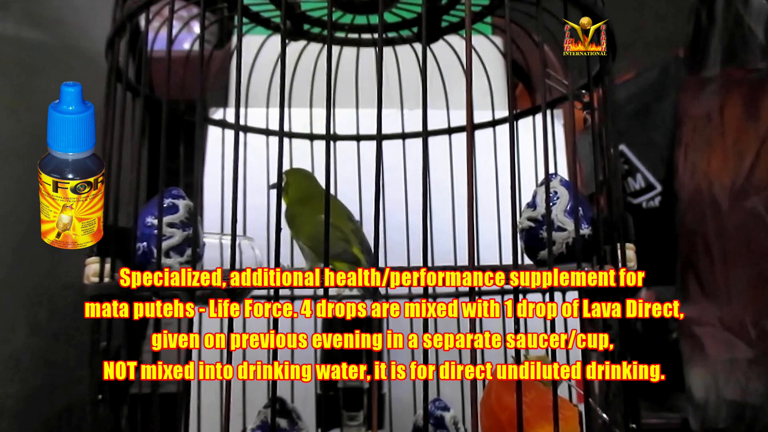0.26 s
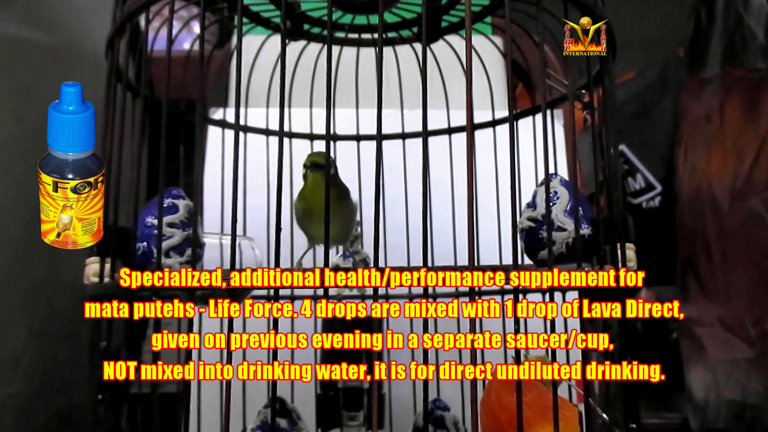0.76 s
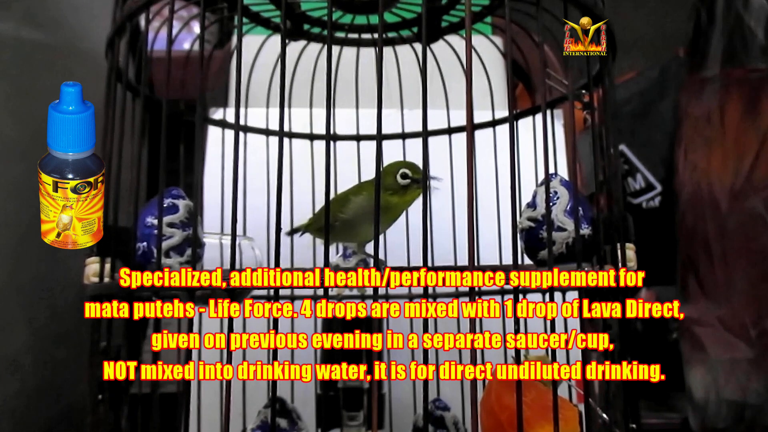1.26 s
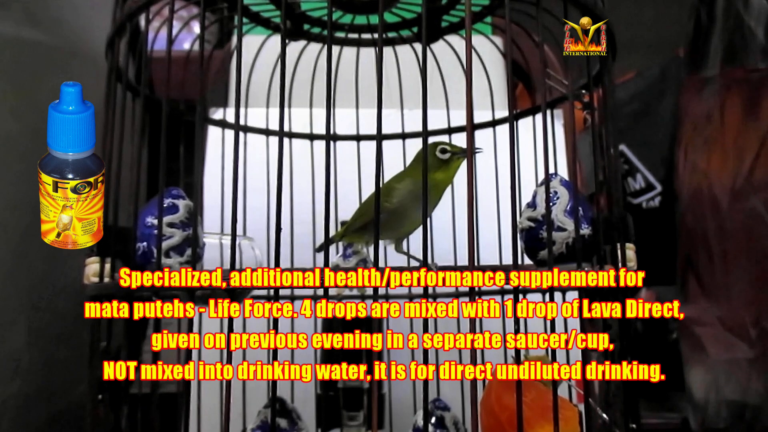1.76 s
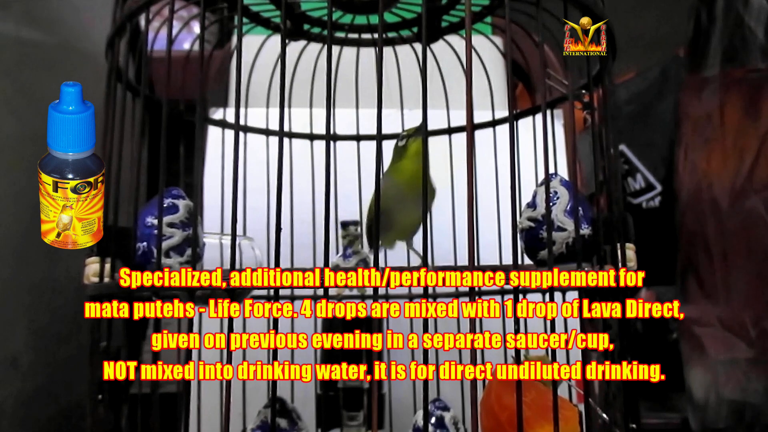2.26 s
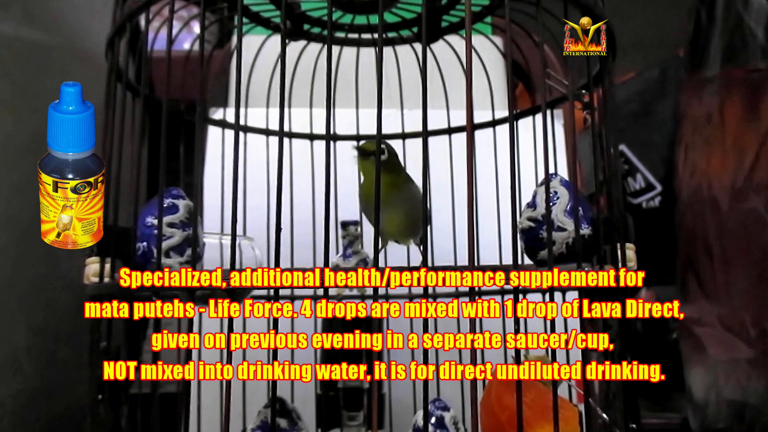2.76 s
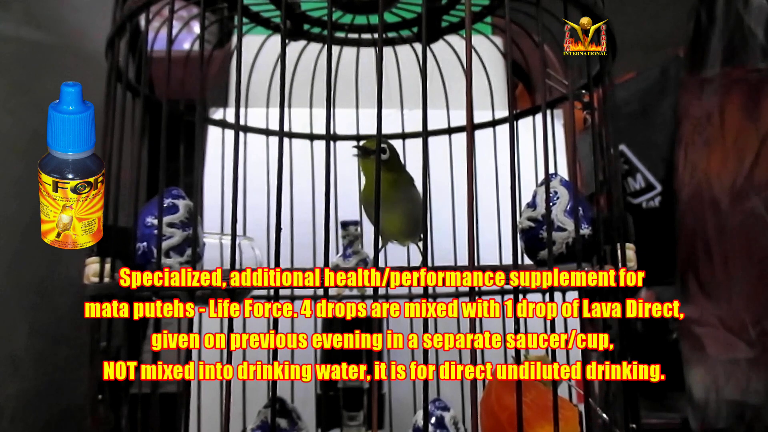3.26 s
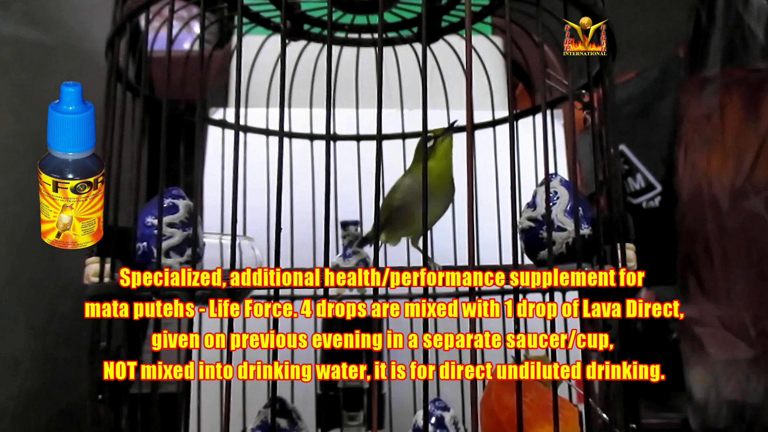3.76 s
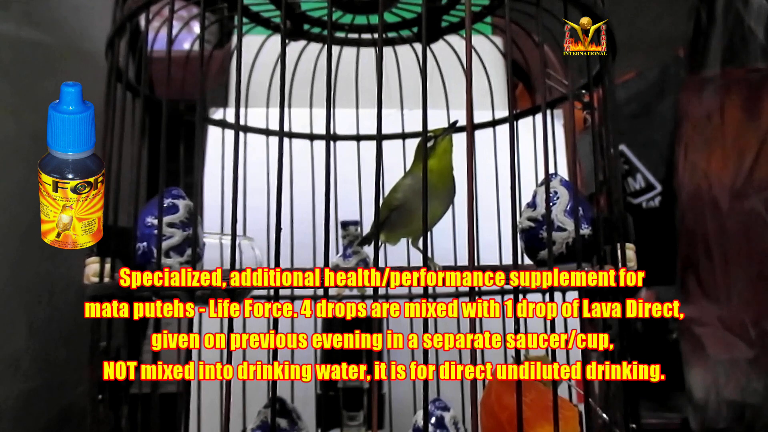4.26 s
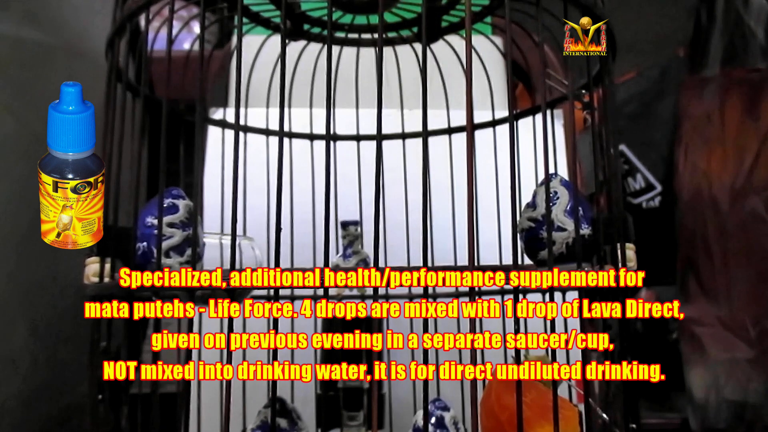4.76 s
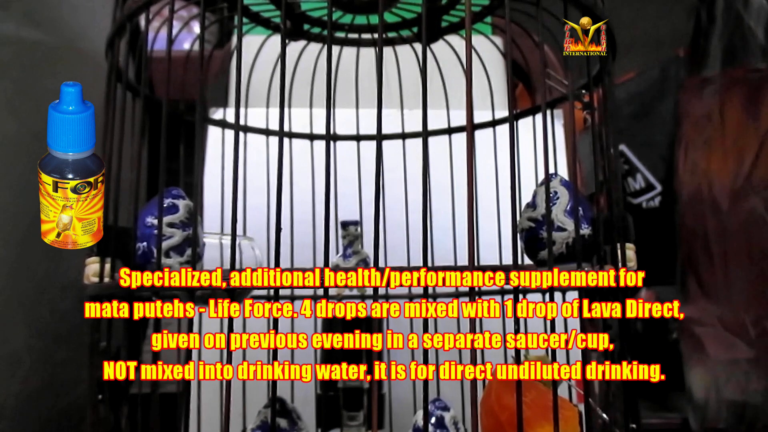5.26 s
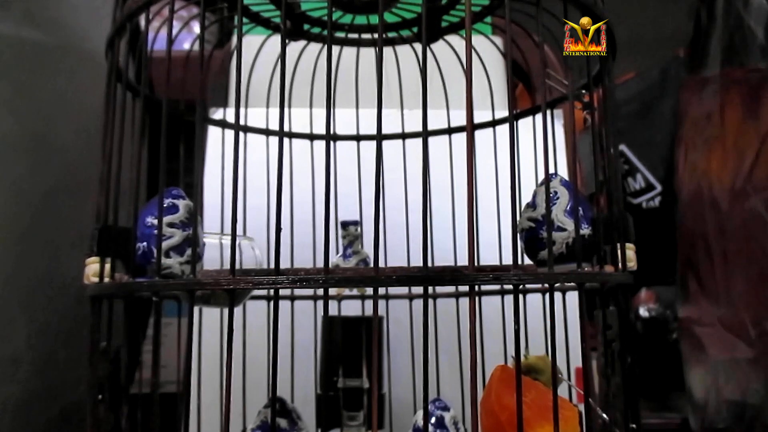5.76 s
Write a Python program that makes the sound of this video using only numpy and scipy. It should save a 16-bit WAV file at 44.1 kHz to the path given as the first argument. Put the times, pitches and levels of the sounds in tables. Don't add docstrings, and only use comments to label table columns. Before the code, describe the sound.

A small caged bird sings quick, high, falling warbled chirps in a hard room while distant birds answer over a faint fan hum and street rumble.

```python
import sys
import numpy as np
from scipy import signal
from scipy.fft import rfft, irfft, next_fast_len
from scipy.io import wavfile
from scipy.ndimage import uniform_filter1d

SR = 44100
rng = np.random.default_rng(int(sys.argv[2]) if len(sys.argv) > 2 else 0)


def to_wav(sig):
    pcm = np.clip(np.atleast_2d(sig), -1, 1) * 32767
    pcm = np.round(pcm).astype(np.int16)
    wavfile.write(sys.argv[1], SR, pcm.T)


def ratio_of_db(decibels):
    return 10 ** (np.asarray(decibels, float) / 20)


N = 265041
TIME = np.arange(N) / SR
PADDED = next_fast_len(N + SR // 10)


def singer():
    # (time [s], length [s], crest pitch [Hz], last pitch [Hz], level [dB])
    syllables = dict( slide=[(0.613, 0.12, 5354, 3463, -18), (1.791, 0.13, 5180, 3100, -18),
                 (3.135, 0.128, 5313, 3173, -18)], swoop=[(1.395, 0.132, 5337, 3096, -18.5),
                 (4.908, 0.13, 5274, 3558, -20)], arch=[(0.317, 0.15, 5050, 3723, -18),
                 (4.608, 0.13, 4647, 3274, -19)], hook=[(2.505, 0.129, 5020, 3330, -20.5),
                 (5.688, 0.125, 5050, 3260, -20.5)], held=[(2.752, 0.133, 4622, 3216, -19.5),
                 (5.957, 0.12, 4680, 3140, -22)], droop=[(-0.03, 0.146, 4790, 3488, -23.5),
                 (0.882, 0.14, 4491, 3150, -23.5), (3.562, 0.128, 4412, 3140, -18.5)],
                 short=[(1.231, 0.0945, 4260, 3177, -33), (4.442, 0.091, 4623, 3760, -22)],
                 shelf=[(3.41, 0.08, 4660, 3545, -25.5)], high_step=[(2.29, 0.1, 5693, 4858, -18.5),
                 (3.777, 0.092, 5707, 4784, -18.5), (5.457, 0.096, 5730, 4865, -18.5)],
                 low_step=[(2.09, 0.12, 4617, 4100, -22.5)], murmur=[(5.256, 0.129, 4650, 4100, -16.5)])
    contours = dict( slide=dict(open_s=0.006, opening=0.87, crest_s=0.012, shoulder_at=0.25, shoulder=0.8, knee_at=0.6, knee=0.33),
                swoop=dict(open_s=0.0064, opening=0.8, crest_s=0.013, shoulder_at=0.34, shoulder=0.8, knee_at=0.52, knee=0.3),
                arch=dict(open_s=0.014, opening=0.91, crest_s=0.037, shoulder_at=0.4, shoulder=0.85, knee_at=0.6, knee=0.48),
                hook=dict(open_s=0.0061, opening=0.94, crest_s=0.024, shoulder_at=0.25, shoulder=0.93, knee_at=0.58, knee=0.2),
                held=dict(open_s=0.0054, opening=0.98, crest_s=0.045, shoulder_at=0.45, shoulder=0.87, knee_at=0.7, knee=0.44),
                droop=dict(open_s=0.0073, opening=1, crest_s=0.018, shoulder_at=0.4, shoulder=0.82, knee_at=0.7, knee=0.32),
                short=dict(open_s=0.013, opening=0.9, crest_s=0.017, shoulder_at=0.25, shoulder=1, knee_at=0.65, knee=0.3),
                shelf=dict(open_s=0.0087, opening=0.85, crest_s=0.013, shoulder_at=0.13, shoulder=0.99, knee_at=0.4, knee=0.24),
                high_step=dict(open_s=0.007, opening=0.92, crest_s=0.014, shoulder_at=0.4, shoulder=0.9, knee_at=0.63, knee=0.07),
                low_step=dict(open_s=0.0094, opening=0.97, crest_s=0.016, shoulder_at=0.55, shoulder=0.4, knee_at=0.65, knee=0.02),
                murmur=dict(open_s=0.007, opening=0.94, crest_s=0.017, shoulder_at=0.37, shoulder=0.55, knee_at=0.63, knee=0.03))
    voices = dict( slide=dict(depth_hz=115, warble_hz=124.2, peak_s=0.011, swell_db=12.5, fade_db=13, flick_hz=450, snap_db=-74.5),
              swoop=dict(depth_hz=137, warble_hz=110.2, peak_s=0.03, swell_db=5, fade_db=11.5, flick_hz=350, snap_db=-66),
              arch=dict(depth_hz=135, warble_hz=118.2, peak_s=0.036, swell_db=6.5, fade_db=15.5, flick_hz=349, snap_db=-46),
              hook=dict(depth_hz=156, warble_hz=115.6, peak_s=0.023, swell_db=11.5, fade_db=10.5, flick_hz=250, snap_db=-53.5),
              held=dict(depth_hz=125, warble_hz=110.5, peak_s=0.058, swell_db=4.5, fade_db=14, flick_hz=300, snap_db=-66),
              droop=dict(depth_hz=114, warble_hz=111.64, peak_s=0.036, swell_db=6, fade_db=7, flick_hz=400, snap_db=-53.5),
              short=dict(depth_hz=65, warble_hz=112.1, peak_s=0.027, swell_db=3, fade_db=-3.5, flick_hz=500, snap_db=-47),
              shelf=dict(depth_hz=45, warble_hz=135, peak_s=0.0067, swell_db=7, fade_db=4, flick_hz=500, snap_db=-47.5),
              high_step=dict(depth_hz=90, warble_hz=128.83, peak_s=0.011, swell_db=6, fade_db=1.5, flick_hz=150, snap_db=-76),
              low_step=dict(depth_hz=140, warble_hz=112, peak_s=0.022, swell_db=9, fade_db=-7, flick_hz=150, snap_db=-69),
              murmur=dict(depth_hz=124, warble_hz=119, peak_s=0.05, swell_db=11, fade_db=19, flick_hz=60, snap_db=-58))
    # (time [s], level of the top multiples [dB])
    beak_turns = [(0.35, 7.5), (0.62, -6.5), (1.25, -7), (1.4, 0), (1.85, -8.5), (2.1, 4), (2.3, 6),
                  (2.8, -11), (3.15, -3), (3.42, 0.5), (3.57, 2.5), (3.78, -6.5), (4.45, 15.5),
                  (4.61, 13.5), (4.92, -9.5), (5.46, -2.5), (5.7, -13)]
    # (time [s], length [s], centre [Hz], width [Hz], level [dB])
    rustles = [
        (0.65, 0.087, 18000, 4000, -76.5),
        (2.88, 0.04, 12000, 7000, -79),
        (4.875, 0.05, 5940, 2160, -62),
        (2.1, 0.0087, 7000, 2500, -76.5),
    ]
    out = np.zeros(N)
    for name, rows in syllables.items():
        for s, *note in rows:
            facing_db = np.interp(s, *np.transpose(beak_turns))
            add(out, s, chirp(*note, facing_db, **contours[name], **voices[name]))
    for s, length, hz, width_hz, db in rustles:
        size = int(length * SR)
        envelope = ratio_of_db(db + 5 * walk(300, size=size)) * np.hanning(size)
        add(out, s, envelope * noise_band(hz, width_hz, size=size))
    return out


def chirp(length, crest_hz, last_hz, level_db, facing_db, warble_hz, snap_db, **shape):
    # (level [dB], share of the facing followed)
    overtones = [(-61, 0.2), (-57.5, 0.29), (-63, 0.67), (-66, 0.96)]
    # (multiple of the syrinx rate, level against their group [dB])
    upper_partials = [(5, -13), (6, -1.5), (7, -5.5), (8, -8)]
    swing, throb = 1.9, 0.38
    stumble_hz = 25
    bead_db, patchy_db = 1.2, 5.5
    age = np.arange(0, length, 1 / SR)
    size = len(age)
    curves = melody(age, crest_hz, last_hz, level_db, **shape)
    hz, db, depth_hz = (uniform_filter1d(curve, size=36) for curve in curves)
    first_db, third_db, fourth_db, upper_db = (base_db + share * facing_db for base_db, share in overtones)

    warble = np.sin(2 * np.pi * warble_hz * age + 0.4 * walk(40, size=size))
    warble = warble * ratio_of_db(1.8 * walk(70, size=size))
    stumble = stumble_hz * depth_hz / 100 * walk(45, size=size)
    syrinx_hz = (hz + swing * depth_hz * warble + stumble) / 2
    phase = 2 * np.pi * np.cumsum(syrinx_hz) / SR
    whistle_level = ratio_of_db(db + bead_db * walk(110, size=size)) * (1 + throb * depth_hz / 100 * warble)
    out = whistle_level * np.sin(2 * phase)

    snap = ratio_of_db(snap_db) * np.exp(-((age - 0.006) / 0.0042) ** 2)
    flash = np.sin(3 * phase) + np.sin(4 * phase) + 0.1 * np.sin(5 * phase)
    out += snap * (flash + 1.2 * noise_band(4600, 2900, size=size))

    beak_db = upper_db - 14 * np.clip(1 - age / (0.63 * age[-1]), 0, 1)
    effort = ratio_of_db(0.05 * (db + 12))
    partials = [(1, first_db), (3, third_db), (4, fourth_db)]
    partials += [(k, beak_db + offset_db) for k, offset_db in upper_partials]
    for k, partial_db in partials:
        patchy = ratio_of_db(partial_db + patchy_db * min(k / 4, 1) * walk(34, size=size))
        patchy = patchy * np.clip((15400 - k * syrinx_hz) / 500, 0, 1)
        out += effort * patchy * np.sin(k * phase)
    out += effort * ratio_of_db(beak_db - 14) * noise_band(12000, 7000, size=size)
    edge_fade = np.clip(np.minimum(age, age[-1] - age) / 0.002, 0, 1)
    return np.sqrt(2) * out * edge_fade


def melody(age, crest_hz, last_hz, level_db, open_s, opening, crest_s, shoulder_at, shoulder,
           knee_at, knee, depth_hz, peak_s, swell_db, fade_db, flick_hz):
    closed_hz, open_db, ease_s = 2732, 24.5, 0.0038
    close_s, close_db = 0.007, 10.5
    throat_hz, throat_db_per_khz = 4100, 8.5
    calm, calm_curve = 0.88, 2.4
    length = age[-1]
    opened = np.clip(age / open_s, 0, 1)
    climbed = np.clip(age / crest_s, 0, 1)
    shut = np.clip(1 - (length - age) / close_s, 0, 1)
    bends_s = np.sort([crest_s, shoulder_at * length, knee_at * length, length - close_s])
    height = np.interp(age, bends_s, [1, shoulder, knee, 0])
    height = uniform_filter1d(height, int(ease_s * SR) + 1, mode="nearest")

    hz = last_hz + (crest_hz - last_hz) * height
    hz = hz - crest_hz * (1 - opening) * (1 - climbed) - flick_hz * shut

    db = level_db - swell_db * np.clip(1 - age / peak_s, 0, 1)
    db = db - fade_db * np.clip((age - peak_s) / (length - peak_s), 0, 1)
    db = db - throat_db_per_khz * np.clip(throat_hz - hz, 0, None) / 1000
    db = db - open_db * (1 - opened) - close_db * shut

    depth = depth_hz * np.clip((age - open_s) / max(peak_s - open_s, 0.002), 0, 1)
    depth = depth * (1 - calm * np.clip(1 - height, 0, 1) ** calm_curve) * (1 - shut)
    return closed_hz + (hz - closed_hz) * np.sin(np.pi / 2 * opened), db, depth


def other_birds():
    # (time [s], length [s], first pitch [Hz], last pitch [Hz], level [dB])
    answers = [(0.115, 0.03, 4400, 3270, -36), (0.261, 0.0388, 5568, 4210, -40.5),
               (1.674, 0.067, 5370, 3440, -44), (1.923, 0.055, 4805, 4730, -42),
               (2.026, 0.071, 4205, 3370, -45), (2.203, 0.067, 3740, 2820, -52.5),
               (3.01, 0.114, 4520, 3450, -48), (3.268, 0.12, 4420, 3560, -44),
               (3.496, 0.078, 4780, 4620, -36), (3.765, 0.099, 4320, 3400, -45.5),
               (3.91, 0.12, 4460, 3184, -47), (4.093, 0.186, 5050, 3344, -44.5),
               (4.193, 0.11, 4780, 4136, -40), (4.299, 0.0504, 4304, 3380, -45),
               (4.405, 0.039, 5446, 5100, -41.5), (4.653, 0.047, 5870, 5700, -64.5)]
    out = np.zeros(N)
    for s, length, first_hz, last_hz, db in answers:
        part = np.arange(0, 1, 1 / (length * SR))
        hz = last_hz + (first_hz - last_hz) * (1 - part) ** 0.99
        hz = hz + 170 * np.sin(2 * np.pi * 115 * part * length)
        phase = np.pi * np.cumsum(hz) / SR
        tone = np.sin(2 * phase) + ratio_of_db(-38.5) * np.sin(3 * phase)
        envelope = np.clip(np.minimum(part / 0.033, (1 - part) / 0.14), 0, 1)
        add(out, s, np.sqrt(2) * ratio_of_db(db) * envelope * tone)
    return out


def engine():
    # (time [s], firing rate [Hz], nearness [dB])
    revs = [
        (0, 53.96, -8.5),
        (2.1, 57.17, -1.5),
        (3.051, 60.14, 2.5),
        (3.6, 67.55, -2),
        (4.801, 76.27, -1),
        (5.6, 81.06, 0),
        (6.01, 83.3, -4),
    ]
    # (centre [Hz], width [Hz], level [dB])
    booms = [(71, 13, -59.5), (141.6, 22, -54), (234.3, 20, -56)]
    s, firing_hz, near_db = np.transpose(revs)
    hz = np.interp(TIME, s, firing_hz) * (1 + 0.0066 * walk(3.8))
    phase = 2 * np.pi * np.cumsum(hz) / SR
    out = np.zeros(N)
    for k in range(1, 5):
        boom = sum(ratio_of_db(db) / (1 + ((k * hz - centre) / width_hz * 2) ** 2) for centre, width_hz, db in booms)
        waver = ratio_of_db(np.interp(TIME, s, near_db) + 3.5 * walk(8.1))
        out += np.sqrt(2) * boom * waver * np.sin(k * phase)
    return out


def drones():
    # (time [s], length [s], pitch [Hz], level [dB])
    passing_tones = [
        (0.107, 0.19, 108.5, -56),
        (1.353, 0.53, 391, -54.5),
        (2.045, 0.33, 289.5, -58.5),
        (2.11, 0.15, 390, -55),
        (3.25, 0.27, 393, -59),
        (4.302, 0.32, 386, -61),
        (2.976, 0.26, 64, -52),
        (3.484, 0.31, 65, -52.5),
        (4.252, 0.203, 69, -58.5),
    ]
    out = np.zeros(N)
    for s, length, hz, db in passing_tones:
        size = int(length * SR)
        tone = np.sin(2 * np.pi * hz * np.cumsum(1 + 0.011 * walk(6.4, size=size)) / SR)
        envelope = ratio_of_db(db + 2.6 * walk(14, size=size)) * np.sqrt(np.hanning(size))
        add(out, s, np.sqrt(2) * envelope * tone)
    return out


def fan():
    # (pitch [Hz], level [dB])
    motor_lines = [(160.76, -54), (104.4, -62), (290, -68.5), (364, -62), (539, -65.5), (824.2, -71.5)]
    out = np.zeros(N)
    for k, (hz, db) in enumerate(motor_lines):
        waver_db = 0.5 if k == 0 else 1.5
        tone = np.sin(2 * np.pi * hz * np.cumsum(1 + 0.00282 * walk(3)) / SR)
        out += np.sqrt(2) * ratio_of_db(db + waver_db * walk(4)) * tone
    return out


def street():
    # (frequency [Hz], density [dB per Hz])
    rumble_colour = [(15, -41), (28, -4), (42, -7.5), (60, -3), (240, -6), (455, -8.5), (836, -9.5),
                     (1470, -19.5), (3170, -26), (4200, -26), (5600, -35), (6700, -37), (8700, -50),
                     (10000, -57), (15000, -76.5)]
    hz = np.arange(PADDED // 2 + 1) * SR / PADDED + 1
    colour_hz, colour_db = np.transpose(rumble_colour)
    coloured = rfft(rng.standard_normal(PADDED)) * ratio_of_db(np.interp(np.log(hz), np.log(colour_hz), colour_db))
    traffic_db = traffic()
    swell_db = traffic_db - traffic_db.mean()
    out = np.zeros(N)
    for centre in 20 * 2.0 ** np.arange(11):
        octave = np.clip(1 - np.abs(np.log2(hz / centre)), 0, 1)
        band = irfft(coloured * octave, PADDED)[:N]
        out += band * ratio_of_db((swell_db + 0.8 * walk(3)) * np.clip(1400 / centre, 0, 1))
    return unit(out) * ratio_of_db(traffic_db.mean() + 3.0)


def traffic():
    # (time closest [s], approach [s], swell [dB])
    vehicles = [
        (0.08, 0.24, 5.5),
        (1.432, 0.17, 3.5),
        (2.25, 0.5, -1),
        (3.75, 3.5, 4.5),
        (4.62, 0.7, 5),
        (5.0, 0.3, -0.5),
    ]
    quiet_db, fade_s = -55, 0.2
    out = np.full(N, float(quiet_db))
    for s, approach, db in vehicles:
        nearing = 1 + (TIME - s) / approach
        leaving = np.exp(np.minimum(s - TIME, 0) / fade_s)
        out += db * np.clip(np.minimum(nearing, leaving), 0, 1)
    return out


def echoes(x, taps, dull_hz=1e6):
    hz = np.arange(PADDED // 2 + 1) * SR / PADDED
    copies = sum(share * np.exp(-2j * np.pi * hz * s) for s, share in taps)
    copies = copies / np.sqrt(1 + (hz / dull_hz) ** 6)
    return irfft(rfft(x, PADDED) * (1 + copies), PADDED)[:N]


def tail(x, t60, onset_s):
    t = TIME[:SR]
    decay = np.exp(-np.log(1000) * t / t60) * (1 - np.exp(-t / onset_s))
    response = rng.standard_normal(SR) * decay
    return signal.fftconvolve(x, response / np.sqrt(np.sum(response ** 2)))[:N]


def noise_band(hz, width_hz, size):
    edges = np.clip([hz - width_hz / 2, hz + width_hz / 2], 100, 20000)
    band = signal.butter(4, edges, "bandpass", fs=SR, output="sos")
    return unit(signal.sosfilt(band, rng.standard_normal(size)))


def walk(rate, size=N):
    k = int(SR / rate)
    held = np.repeat(rng.standard_normal(size // k + 1), k)
    return 1.477 * uniform_filter1d(uniform_filter1d(held, k), k)[:size]


def unit(x):
    return x / np.sqrt(np.mean(x ** 2))


def add(out, s, sound):
    start = int(s * SR)
    sound, start = sound[max(-start, 0):], max(start, 0)
    out[start:start + len(sound)] += sound[:len(out) - start]


def scene():
    # (delay [s], share of the direct sound)
    wall_taps = [(.0028, 0.054), (.0044, 0.087), (.0085, 0.053)]
    echo_s = 785.5 / SR
    near, far = singer(), other_birds()
    dull = signal.sosfilt(signal.butter(2, 9500, fs=SR, output="sos"), near)
    room = ratio_of_db(-8.5) * tail(dull, t60=0.19, onset_s=0.0011)
    room = room + ratio_of_db(-18.5) * tail(dull, t60=0.35, onset_s=0.031)
    birds = echoes(near, wall_taps, dull_hz=9000) + room + tail(far, t60=0.45, onset_s=0.009)
    floor = echoes(street(), [(echo_s, 0.21)]) + fan() + engine() + drones()
    return (echoes(birds, [(echo_s, 0.4265)], dull_hz=10500) + floor)[None]


def low_pass(x):
    return signal.sosfilt(signal.butter(12, 15800, fs=SR, output="sos"), x)


def record(dry):
    return low_pass(dry)


dry = scene()
out = record(dry)
to_wav(out)
```